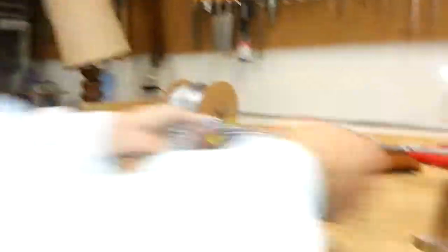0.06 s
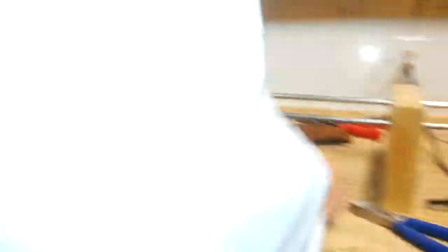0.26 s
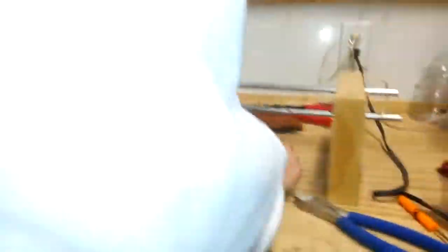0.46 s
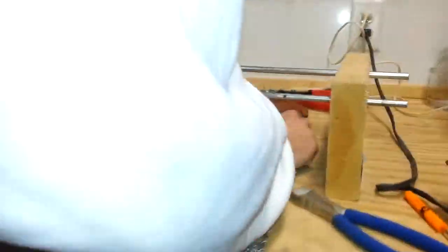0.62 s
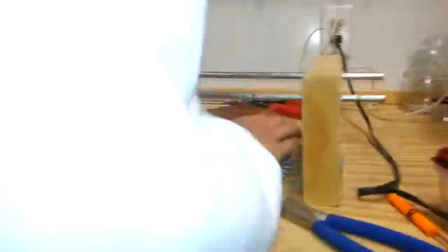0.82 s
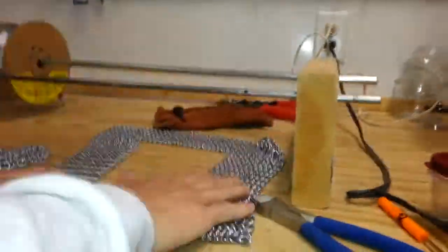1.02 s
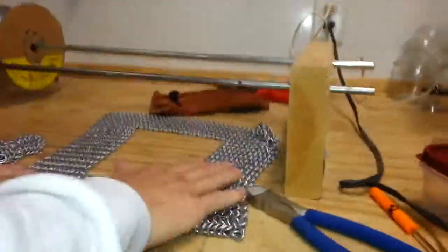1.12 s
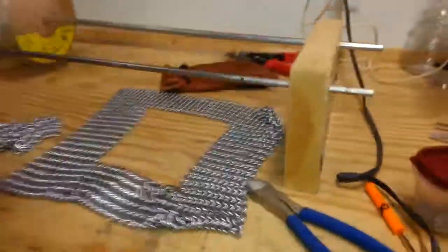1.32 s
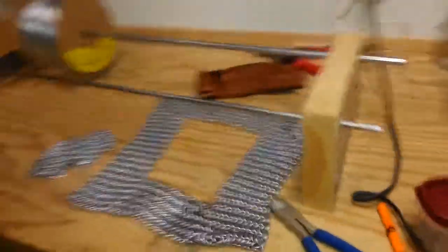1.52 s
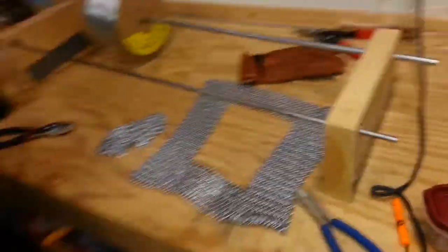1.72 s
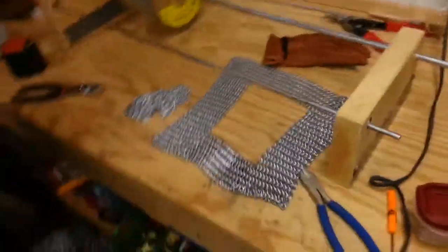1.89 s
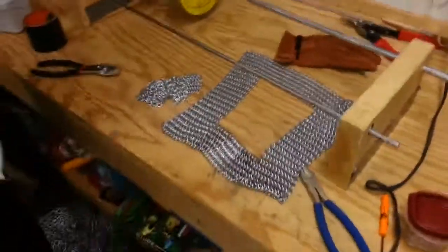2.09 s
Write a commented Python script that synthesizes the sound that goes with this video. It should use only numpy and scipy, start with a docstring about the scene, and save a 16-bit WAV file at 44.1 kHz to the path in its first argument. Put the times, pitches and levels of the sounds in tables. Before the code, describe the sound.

Chainmail crashes onto a wooden workbench and is dragged flat, rattling and jingling.

```python
"""Chainmail dropped on a workbench

A sheet of chainmail lands on a wooden bench, overloading a nearby camera's microphones, and is dragged
flat by hand. Thousands of ring contacts rattle the board; a few rings tick on their own and the bench
is knocked as the hand leaves. Three close, dry clicks and a faint rustle follow, over workshop noise."""
import sys
import numpy as np
from scipy import signal
from scipy.fft import rfft, irfft, next_fast_len
from scipy.io import wavfile
from scipy.ndimage import uniform_filter1d

SR = 44100
rng = np.random.default_rng(int(sys.argv[2]) if len(sys.argv) > 2 else 0)


def transcribe(signal):
    """Save signal, clipped to [-1, 1], as a 16-bit WAV file at the path in sys.argv[1]."""
    frames = np.atleast_2d(signal).T
    limited = np.clip(frames, -1, 1)
    pcm = np.round(limited * 32767).astype(np.int16)
    wavfile.write(sys.argv[1], SR, pcm)


N = 94815
TOP_HZ, CLICK_S = 14750, 0.00087
PAN = np.array([[.5], [-.5]])  # splits a left-right dB difference between the channels


def drop():
    """The sheet lands in a crash that brightens as it piles up; heavy folds slap, brief notes ring."""
    # Each row: time in seconds, crash level in dB, bright splash level in dB.
    pile_up = [(.183, -61, -61.5), (.194, -14.5, -23), (.209, -13, -27.5), (.218, -8.5, -19),
               (.238, -12.5, -21), (.255, -13.5, -11), (.268, -11, -10.5), (.284, -8.5, -8.5),
               (.296, -19, -20.5), (.32, -26.5, -29.5), (.37, -54, -61.5)]
    # Each row: start in seconds, level in dB, t60 in seconds.
    fold_slaps = [(0.2193, -1.5, 0.085), (0.2447, -2, 0.068), (0.2664, -2, 0.042), (.2805, -3.5, .035)]
    # Each row: start in seconds, level in dB, left-right in dB, pitch in Hz, t60 in seconds.
    brief_notes = [(0.2213, -7.5, 9, 1667, 0.078), (0.243, -6.5, 2, 2750, 0.12),
                   (0.2497, -0.5, -1, 925, 0.044), (0.25, -14, -4.5, 7870, .06),
                   (.2655, -9, 5, 2310, 0.088), (0.269, -1.5, -8.5, 3192, 0.071),
                   (0.267, -7, -11.5, 4850, 0.092), (.279, -1, 0, 3780, 0.042),
                   (.302, -27.5, -1, 644, 0.12)]
    # Spectra. Each row: frequency in Hz, relative gain in dB.
    crash_colour = [(25, -25.5), (90, -28), (200, -23.5), (310, -8.5), (480, -10), (720, -10), (950, -5.5),
                    (1250, -6), (1650, -5), (2300, 0), (3400, -4), (4300, -12.5), (6000, -20),
                    (14000, -42.5)]
    splash_colour = [(500, -73.5), (2500, -11.5), (3900, -2.5), (4700, -2), (6000, -7.5), (7800, -3.5),
                     (10000, -7.5), (14500, -15)]
    # Each row: frequency in Hz, left-right in dB.
    balance = [(100, 0), (800, 1), (1250, 4), (1650, 3.5), (2400, 4.5), (3400, 7), (4600, -6.5),
               (14000, -1.5)]
    body, splash = envelopes(pile_up)
    power = body[None] ** 2
    notes, t = np.zeros((2, N)), np.arange(SR // 4) / SR
    for start_s, db, t60_s in fold_slaps:
        add(power, start_s, amp(db - 60 * t / t60_s) ** 2)
    for start_s, db, pan_db, hz, t60_s in brief_notes:
        ring = tone(hz, width_hz=0.031 * hz, size=len(t)) * (1 - np.exp(-t / 0.001))
        add(notes, start_s, ring * amp(db - 60 * t / t60_s + PAN * pan_db))
    crash = np.sqrt(power) * contacts(crash_colour, per_s=6000, spread_db=5.5, t60_s=0.041)
    crash += splash * contacts(splash_colour, per_s=5200, spread_db=6.0, t60_s=0.015)
    return placed(crash, balance) + notes


def drag():
    """Sliding rings rattle and catch on the wood, jingle against each other and make the board rumble."""
    # Each row: time in seconds, relative rattle and jingle levels in dB.
    hand_drag = [(.31, -27, -33), (.358, -27.5, -40.5), (.46, -26.5, -38), (.5, -21, -34.5),
                 (.526, -19.5, -32), (.562, -24, -35.5), (.695, -25, -34), (.728, -30, -36.5),
                 (.796, -29.5, -35), (.842, -25, -37.5), (.88, -24, -32), (.894, -19.5, -34),
                 (.903, -25.5, -35.5), (.925, -24, -34.5), (.952, -31, -42), (.966, -24, -53),
                 (.998, -40, -47.5), (1.06, -25.5, -38), (1.115, -27.5, -32.5), (1.194, -37.5, -50.5),
                 (1.262, -44, -45), (1.304, -42.5, -67), (1.316, -38, -49), (1.358, -65, -83),
                 (1.376, -45.5, -53), (1.39, -58, -73)]
    # Each row: time in seconds, relative level in dB.
    board_rumble = [(.3, -24.5), (.312, -29), (.35, -43), (.53, -31), (.626, -37), (.89, -37.5), (1.0, -42),
                    (1.092, -40), (1.25, -54), (1.29, -45.5), (1.39, -59.5)]
    # Single rings tick; rows of rings catch and slip. Each row: start in seconds, level in dB.
    ring_ticks = [(0.3383, -29), (0.52, -20.5), (0.691, -19.5), (0.765, -17), (0.7893, -13)]
    ring_slips = [(.8315, -16), (0.8657, -17), (.872, -9), (0.8864, -12), (0.89, -7), (0.8951, -9),
                  (.923, -17), (0.939, -22.5), (0.9614, -20.5)]
    # Spectra. Each row: frequency in Hz, relative gain in dB.
    rattle_colour = [(60, -55), (250, -31), (600, -14), (950, -2), (1300, -3.5), (1900, -2), (2400, -1),
                     (3500, -3.5), (4500, -10), (6500, -19), (14000, -39.5)]
    jingle_colour = [(2500, -27.5), (4000, -6), (5000, 1), (6000, -8), (7300, -2.5), (9000, -3),
                     (11200, -15.5), (13000, -10.5), (14500, -11.5)]
    board_colour = [(40, -44.5), (110, -27.5), (180, -2), (250, -5.5), (410, -1.5), (520, -5.5), (660, 0),
                    (1100, -8.5), (3000, -52)]
    tick_colour = [(500, -17), (5500, -9.5), (8700, 3), (10500, -15), (14000, -6)]
    slip_colour = [(200, -35), (1400, -15.5), (1920, -1.5), (3600, -1), (4400, -21), (14000, -41)]
    # Sheet on the board. Each row: frequency in Hz, width in Hz, boost in dB.
    resonances = [(301, 16, 4), (382, 110, 3.5), (1643, 160, 7), (7160, 580, 6)]
    # Each row: frequency in Hz, left-right in dB.
    balance = [(100, 1), (400, -2), (700, -1), (1100, 3), (1700, 3.5), (2800, 4.5), (3700, -3),
               (4500, -7.5), (7100, -7.5), (9500, -1), (11500, -4)]
    rattle, jingle = envelopes(hand_drag)
    board, = envelopes(board_rumble)
    sound = amp(0.5) * rattle * contacts(rattle_colour, per_s=2200, spread_db=3.5, t60_s=0.013, spots=24)
    sound += amp(1) * jingle * contacts(jingle_colour, per_s=1300, spread_db=2.0, t60_s=0.013)
    sound += amp(1) * board * contacts(board_colour, per_s=2300, spread_db=7.5, t60_s=0.042, spots=24)
    for start_s, db in ring_ticks:
        add(sound, start_s, amp(db) * coloured(burst(t60_s=0.0081), tick_colour))
    for start_s, db in ring_slips:
        add(sound, start_s, amp(db) * coloured(burst(t60_s=0.021), slip_colour))
    for hz, width_hz, boost_db in resonances:
        sound = resonant(sound, hz, hz / width_hz, boost_db)
    return placed(sound, balance)


def contacts(colour, per_s, spread_db, t60_s, spots=12):
    """A shower of contacts of uneven strength; each spot has its own short decay."""
    out = np.zeros((2, N))
    for _ in range(spots):
        struck = rng.random(N) < per_s / spots / SR
        strength = amp(spread_db * np.clip(rng.standard_normal(N), -2, 2))
        hits = struck * strength * rng.choice([-1, 1], N)
        out += signal.oaconvolve(hits[None], burst(t60_s, size=2048), axes=1)[:, :N]
    return unit(coloured(out, colour))


def knocks(pan_db=3, attack_s=0.00105):
    """Each knock rings the bench's modes and shakes the rings lying on it."""
    # Each row: start in seconds, gain of the modes in dB, ring rattle in dB.
    blows = [(.002, -41, -46), (.407, -26, -24), (.963, -22, -33), (1.208, -37, -36.5), (1.268, -32, -34),
             (1.2762, -20.5, -23.5)]
    # Each row: frequency in Hz, relative level in dB, t60 in seconds.
    bench_modes = [(680, -6.5, 0.11), (1024, -12, 0.11), (1150, -7.5, 0.12), (1910, 6, 0.044),
                   (2000, -8, 0.078), (2630, -23, 0.087), (2950, -14.5, 0.062), (2900, -9, 0.072)]
    # Each row: frequency in Hz, relative gain in dB.
    rattle_colour = [(40, -13), (200, -19), (600, -7), (1100, 4), (2000, -3.5), (3300, 2.5), (4500, -35),
                     (14000, -37)]
    out, t = np.zeros((2, N)), np.arange(SR // 4) / SR
    for start_s, db, rattle_db in blows:
        wood = np.zeros((2, len(t)))
        for hz, mode_db, t60_s in bench_modes:
            decay = amp(mode_db + rng.normal(0, 1, (2, 1)) - 60 * t / t60_s)
            wood += decay * tone(hz, width_hz=0.01 * hz, size=len(t))
        add(out, start_s, amp(db) * wood * (1 - np.exp(-t / attack_s)))
        add(out, start_s, amp(rattle_db) * coloured(burst(t60_s=0.081), rattle_colour))
    return out * amp(PAN * pan_db)


def clicks(q=3):
    """Dry snaps: a scattered spike reaches each microphone with its own broad resonance."""
    # Each row: start in seconds, level in dB, left-right in dB, left resonance in Hz,
    # its boost in dB, right resonance in Hz, its boost in dB.
    snaps = [(1.423, -18, 2.5, 2070, 10.5, 7400, 6), (1.441, -7.5, -6, 1800, 2, 4950, 11),
             (1.695, -24.5, 8, 1360, 9, 3900, 14)]
    # Each row: frequency in Hz, relative gain in dB.
    colour = [(50, -27), (200, -25), (550, 1), (1100, 1), (2500, -0.5), (7500, 1), (11000, -4.5),
              (14500, -9)]
    out = np.zeros((2, N))
    for start_s, db, pan_db, left_hz, left_db, right_hz, right_db in snaps:
        left, right = coloured(np.array([scattered_spike(), scattered_spike()]), colour)
        snap = np.array([resonant(left, left_hz, q, left_db), resonant(right, right_hz, q, right_db)])
        snap *= np.sqrt(SR * CLICK_S) / np.linalg.norm(snap, axis=1, keepdims=True)
        add(out, start_s, snap * amp(db + PAN * pan_db))
    return out


def scattered_spike(stages=6, size=2048):
    """Random all-pass filters smear a spike over a click's length; its spectrum stays flat."""
    x = signal.unit_impulse(size)
    positions = (np.arange(stages) + rng.random(stages)) / stages
    for hz in TOP_HZ * positions ** 2 + 1 / CLICK_S / 2:
        x = x - 2 * signal.lfilter(*signal.iirpeak(hz, hz * CLICK_S, SR), x)
    return x


def rustle():
    """Dense, tiny contacts make a faint rustle, perhaps of a sleeve."""
    # Each row: time in seconds, level in dB.
    swells = [(0, -51), (.17, -52.5), (1.38, -67), (1.55, -58), (1.8, -67), (1.835, -48.5), (1.87, -54.5),
              (1.94, -49), (2.15, -55)]
    # Each row: frequency in Hz, relative gain in dB.
    colour = [(100, -42.5), (500, -12), (1500, -4.5), (2200, -1.5), (3200, -6), (5000, -10), (7000, -11),
              (10000, -19.5), (14500, -17)]
    # Each row: frequency in Hz, left-right in dB.
    balance = [(2000, 5.5), (6000, -8), (14000, -4)]
    gain, = envelopes(swells)
    return placed(gain * contacts(colour, per_s=8700, spread_db=1, t60_s=0.0046), balance)


def workshop(noise_db=-52):
    """Low, steady noise and a faint hum."""
    # Each row: frequency in Hz, relative gain in dB.
    colour = [(25, -35.5), (60, -14.5), (120, -5), (220, -2), (320, -3), (520, -6.5), (800, -11.5),
              (1600, -17.5), (3200, -18.5), (4600, -21.5), (5250, -13.5), (6100, -23.5), (9000, -20),
              (14500, -25.5)]
    # Each row: frequency in Hz, level in dB.
    hum_lines = [(118.4, -68), (226.1, -61), (393.0, -64.5), (506.0, -65.5)]
    noise = coloured(rng.standard_normal((2, N)), colour)
    noise = unit(placed(noise, balance=[(60, 2), (200, -0.5), (8000, -2)]))
    hum = sum(amp(db) * unit(tone(hz, width_hz=3.5, size=N)) for hz, db in hum_lines)
    return amp(noise_db) * noise + hum


def room(x):
    """The workshop's short reverberation; the treble lasts slightly longer."""
    # Each row: frequency in Hz, t60 in seconds.
    decay_times = [(200, 0.13), (2000, 0.13), (12000, 0.22)]
    hz, t, spectra = signal.stft(rng.standard_normal((2, SR // 2)), SR, nperseg=256)
    decay = amp(-60 * t / along(decay_times, hz)[:, None])
    tail = signal.istft(spectra * decay, SR, nperseg=256)[1]
    return signal.fftconvolve(x, tail / np.linalg.norm(tail[0]), axes=1)[:, :N]


def placed(pair, balance):
    """Two unrelated signals become left and right: bass alike, treble apart."""
    # Each row: frequency in Hz, left-right correlation.
    correlation = [(40, 0.74), (130, .8), (400, 0.89), (800, 0.78), (1300, 0.16), (2200, 0.13),
                   (5000, -0.07)]

    def mid_side_gains(hz):
        angle = np.arccos(np.clip(along(correlation, hz), -1, 1)) / 2
        return np.array([np.cos(angle), np.sin(angle)])

    mid, side = filtered(pair, mid_side_gains)
    return filtered(np.array([mid + side, mid - side]), lambda hz: amp(PAN * along(balance, hz)))


def amp(db):
    """Decibels to gain."""
    return 10 ** (np.asarray(db) / 20)


def unit(x):
    """Scale to rms 1."""
    return x / np.sqrt(np.mean(x ** 2) + 1e-20)


def along(points, hz):
    """Read (Hz, value) points on a log axis."""
    points_hz, values = np.transpose(points)
    return np.interp(np.log(hz + 1), np.log(points_hz + 1), values)


def envelopes(rows, fade_s=0.026):
    """One gain curve per dB column, fading outside the rows' time span."""
    times_s, *columns_db = np.transpose(rows)
    t = np.arange(N) / SR
    outside_s = np.abs(t - np.clip(t, times_s[0], times_s[-1]))
    return [amp(np.interp(t, times_s, db)) * np.exp(-outside_s / fade_s) for db in columns_db]


def filtered(x, response):
    """Zero-phase filter with gain response(hz)."""
    size = next_fast_len(N + SR // 2)
    return irfft(rfft(x, size) * response(np.fft.rfftfreq(size, 1 / SR)), size)[..., :N]


def coloured(x, colour, size=2048):
    """Minimum-phase, unit-energy filter shaped by (Hz, dB) points."""
    cepstrum = irfft(np.log(amp(along(colour, np.fft.rfftfreq(size, 1 / SR)))))
    cepstrum[1:size // 2] *= 2
    cepstrum[size // 2 + 1:] = 0
    impulse = irfft(np.exp(rfft(cepstrum)))
    return signal.fftconvolve(x, impulse[None] / np.linalg.norm(impulse), axes=1)[:, :x.shape[1]]


def resonant(x, hz, q, boost_db):
    """Lift one resonance."""
    return x + (amp(boost_db) - 1) * signal.lfilter(*signal.iirpeak(hz, q, SR), x)


def tone(hz, width_hz, size):
    """A sine whose wandering phase widens its line."""
    drift = np.cumsum(rng.standard_normal(size)) * np.sqrt(2 * np.pi * abs(width_hz) / SR)
    cycles = hz * np.arange(size) / SR + rng.random()
    return np.sin(2 * np.pi * cycles + uniform_filter1d(drift, int(SR / hz * 2)))


def burst(t60_s, size=8192):
    """Decaying stereo noise."""
    return rng.standard_normal((2, size)) * amp(-60 * np.arange(size) / SR / t60_s)


def add(track, start_s, sound):
    """Mix a sound into the track in place."""
    part = track[:, int(start_s * SR):][:, :sound.shape[-1]]
    part += sound[..., :part.shape[1]]


def scene(mail_send_db=-11.5, click_send_db=-31):
    """Chainmail and bench in the room, with the clicks close by."""
    mail = drop() + drag() + knocks()
    snaps = clicks()
    reverb = room(amp(mail_send_db) * mail + amp(click_send_db) * snaps)
    return mail + snaps + reverb + workshop() + rustle()


def record(dry):
    """The camera saturates on the crash and cuts the treble at its band limit."""
    saturated = dry / (1 + np.abs(dry) ** 8) ** (1 / 8)
    return filtered(saturated, lambda hz: np.clip((TOP_HZ - hz) / 500 + .5, 0, 1))


dry = scene()
out = record(dry)
transcribe(out)
```